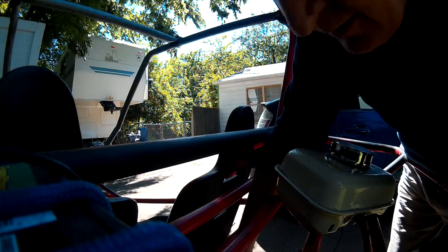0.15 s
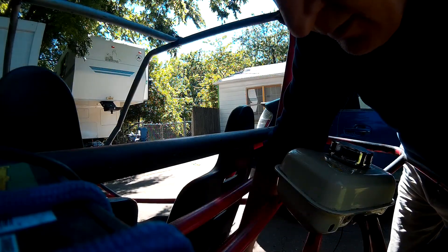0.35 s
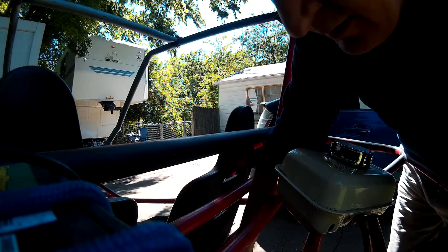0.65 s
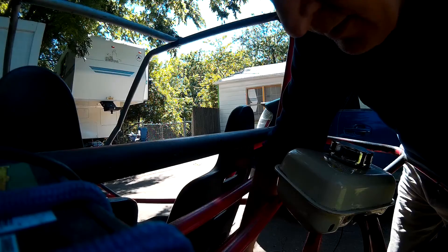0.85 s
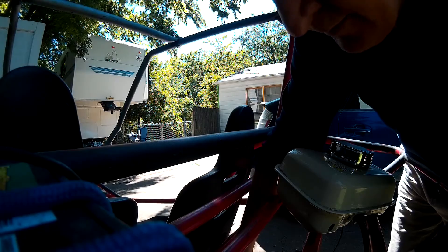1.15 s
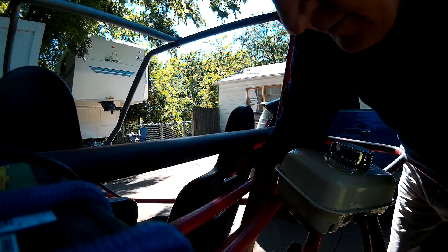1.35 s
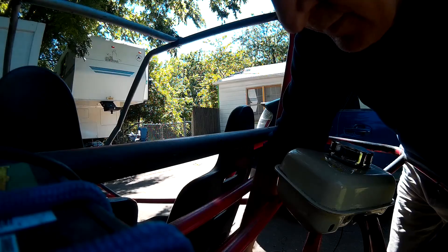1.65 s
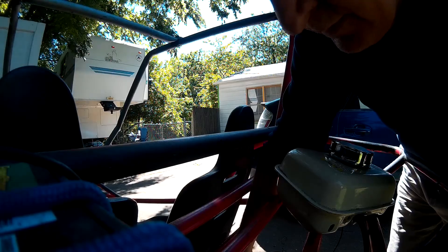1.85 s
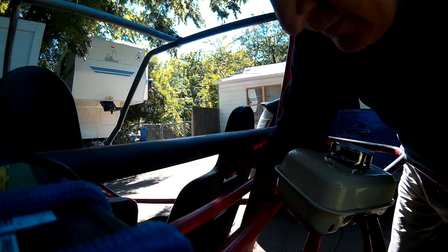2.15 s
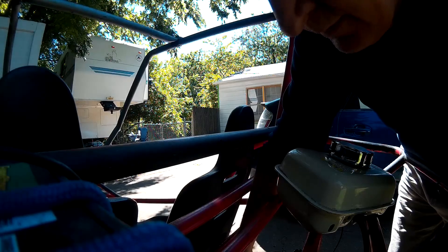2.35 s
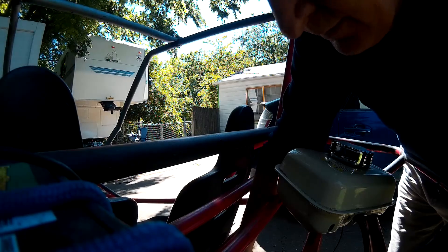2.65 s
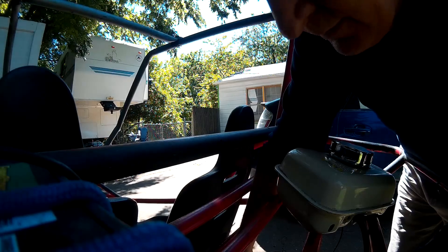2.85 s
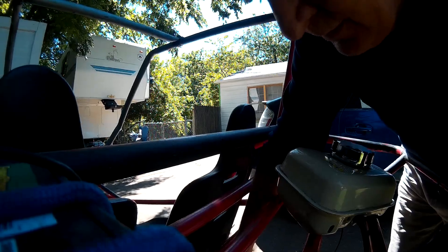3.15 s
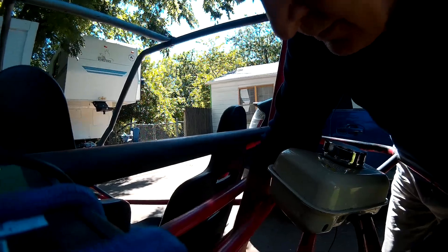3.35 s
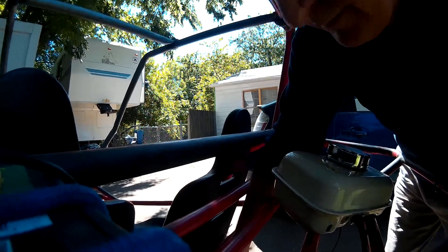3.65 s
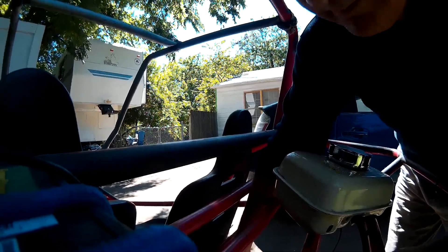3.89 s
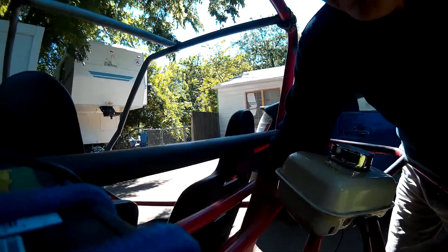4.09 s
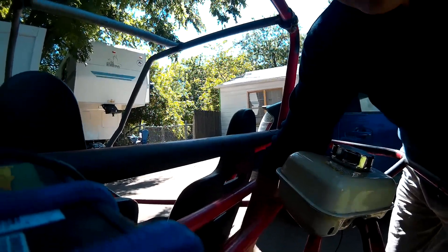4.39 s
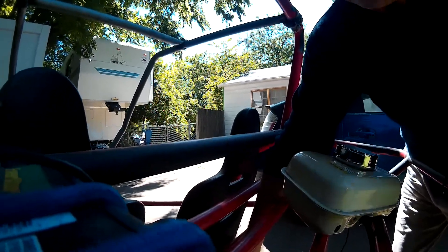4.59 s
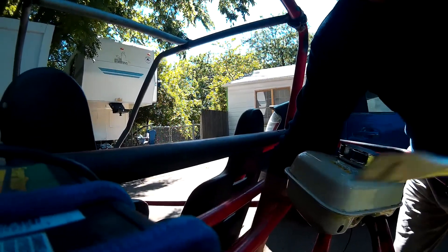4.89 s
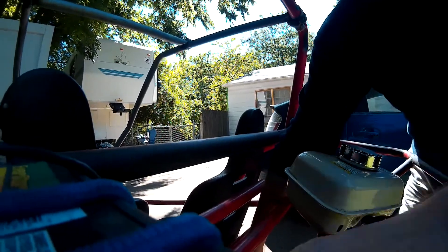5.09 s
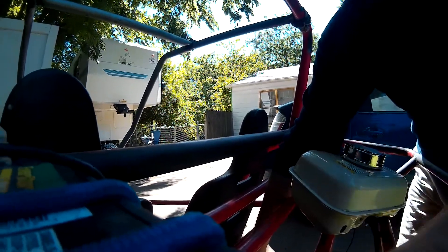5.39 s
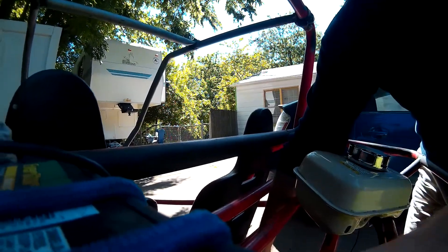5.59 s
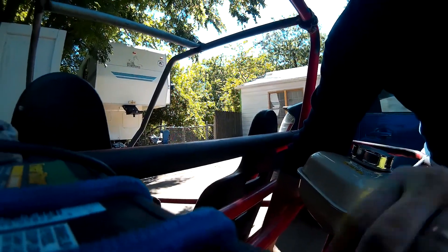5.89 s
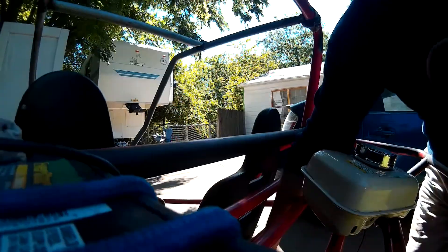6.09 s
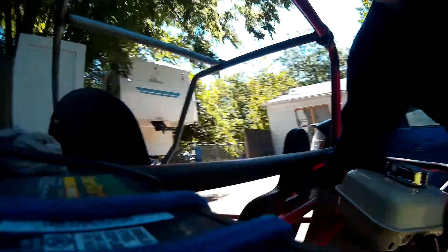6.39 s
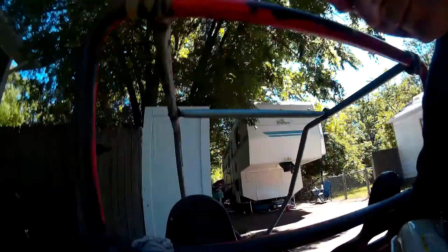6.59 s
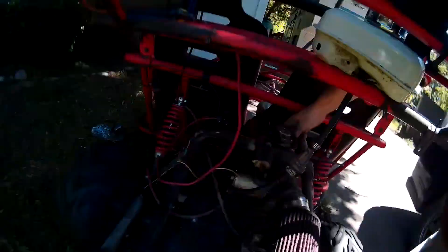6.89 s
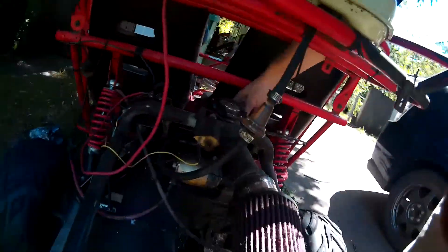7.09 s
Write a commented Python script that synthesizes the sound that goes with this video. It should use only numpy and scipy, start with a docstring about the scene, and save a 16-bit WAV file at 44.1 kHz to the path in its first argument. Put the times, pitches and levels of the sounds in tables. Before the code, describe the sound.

In a quiet yard, a go-kart's starter grinds with short metallic squeals and winds down. After a pause it tries again and fails. On the third try the single-cylinder engine coughs and catches, running raggedly before settling into a thudding idle with a muffled exhaust. Loose metal rattles, snaps and clanks over it, close enough to briefly overload the microphone.

```python
"""A single-cylinder go-kart engine in a quiet yard, with the microphone inside the frame.
The starter's gears grind and its slipping clutch squeals through two failed tries; on the third the
airbox coughs, the engine catches and firings ring the muffler, ragged at first, then a thudding idle.
Loose metal rattles, clanks and snaps over the exhaust, close enough to overload the microphone,
which swings round behind the engine near the end."""
import sys
import numpy as np
from scipy import signal
from scipy.fft import rfft, irfft
from scipy.io import wavfile

SR = 44100
rng = np.random.default_rng(int(sys.argv[2]) if len(sys.argv) > 2 else 0)


def dump_mix(stems):
    """Bounce the given channels to the path in sys.argv[1] as a 16-bit WAV at rate SR."""
    frames = np.atleast_2d(stems).T  # one column per channel
    limited = np.clip(frames, -1, 1)  # hard clip at full scale
    pcm = np.round(limited * 32767).astype(np.int16)
    wavfile.write(sys.argv[1], SR, pcm)


N = 319284
TIME = np.arange(N) / SR

# The starter housing's resonances. Each row: pitch in Hz, width in Hz, gain in dB.
HOUSING_MODES = [(742, 14, -3), (938, 39, -6.5), (1065, 35, -7), (1275, 98, -2.5), (1550, 92, -2.5),
                 (1716, 55, 3), (1805, 180, -7.5), (2730, 26, -7.5), (3230, 37, -13), (3730, 290, -17.5),
                 (4480, 37, -20)]
# The starter clutch slipping under load. Each row: start in seconds, hold in seconds,
# release in seconds, top pitch in Hz, squeal in dB, grating in dB.
CLUTCH_SLIPS = [(0.302, .008, 0.033, 1256, -21.5, -13.5), (.463, 0.0049, 0.0081, 1485, -19.5, -20),
                (.494, 0.0051, 0.0073, 1509, -11, -11.5), (0.516, .006, .01, 1434, -8, -13),
                (0.573, 0.0036, 0.03, 1486, -8.5, -12.5), (1.843, 0.0047, 0.011, 1790, -20.5, -20),
                (1.892, 0.0047, 0.018, 1472, -23, -16), (2.113, 0.0062, 0.014, 1490, -18, -14),
                (2.14, 0.0033, 0.0077, 1835, -12.5, -11), (2.8, 0.031, 0.01, 1230, -15.5, -23),
                (2.857, 0.045, 0.032, 1370, -12.5, -19), (3.415, .001, 0.0093, 1396, -11.5, -7.5)]
# The engine stumbles, fades and catches. Each row: time in seconds, strength in dB.
CATCHING = [(3.05, -29), (3.11, 4.5), (3.27, -5.5), (3.38, -14.5), (3.58, -1), (3.7, 1)]
# Combustion steadies as the engine settles. Each row: time in seconds, raggedness from 0 to 1.
RAGGEDNESS = [(3.7, 0.95), (4.3, 0.55), (4.9, 0.15), (5.5, 0)]
# The spectrum of a hard crack of metal. Each row: frequency in Hz, level in dB.
CRACK_SPECTRUM = [(500, 0.5), (1600, 6.5), (3000, -0.5), (4500, -1), (6000, -14), (10000, -13),
                  (16000, -20)]
SLIP_ATTACK_S = .006


def from_db(db):
    """Decibels to gain."""
    return 10 ** (np.asarray(db) / 20)


def rms_one(x):
    """Scale to an rms of 1."""
    return x / np.sqrt(np.mean(x ** 2) + 1e-20)


def curve(rows, outside=None):
    """Join rows of time and value by straight lines."""
    return np.interp(TIME, *np.transpose(rows), outside, outside)


def coloured(x, spectrum):
    """Give a steady signal a spectrum; rms 1."""
    hz, db = np.transpose(spectrum)
    bins = np.maximum(np.arange(N // 2 + 1) * SR / N, 1)
    gain = from_db(np.interp(np.log(bins), np.log(hz), db))
    bass_cut = np.minimum(bins / hz[0], 1) ** 2
    return rms_one(irfft(rfft(x) * gain * bass_cut, N))


def drift(per_s):
    """A random wander that turns about per_s times a second; rms 1."""
    return rms_one(np.interp(TIME * per_s, np.arange(N), rng.standard_normal(N)))


def grains(per_s, spread_db):
    """Random tiny impacts of uneven size; rms 1."""
    impacts = (rng.random(N) < per_s / SR) * rng.choice([-1, 1], N)
    return rms_one(impacts * from_db(spread_db * rng.standard_normal(N)))


def clicks(times, gains):
    """One impulse at each time."""
    at = np.round(np.asarray(times) * SR).astype(int)
    return np.bincount(np.maximum(at, 0), gains, N)[:N]


def swell(centre, length):
    """A bell-shaped rise and fall."""
    out = np.zeros(N)
    near = slice(*np.searchsorted(TIME, [centre - 3 * length, centre + 3 * length]))
    out[near] = np.exp(-2 * ((TIME[near] - centre) / length) ** 2)
    return out


def resonate(x, modes):
    """Parallel resonances of alternating sign, from rows of pitch in Hz, width in Hz, gain in dB."""
    out = 0
    for k, (hz, width, db) in enumerate(modes):
        r = np.exp(-np.pi * width / SR)
        poles = [1, -2 * r * np.cos(2 * np.pi * hz / SR), r * r]
        gain = (-1) ** k * from_db(db) * (1 - r * r) / 2
        out = out + gain * signal.lfilter([1, 0, -1], poles, x + 1e-18)
    return out


def dying(t60):
    """An envelope that falls by 60 dB in t60 seconds."""
    return np.exp(-np.minimum(np.log(1000) * TIME / t60, 50))


def play(hits, response):
    """Every hit sets off the first half second of the response."""
    return signal.oaconvolve(hits, response[:SR // 2])[:N]


def bandpass(x, low_hz, high_hz):
    """Take away the steady part and round off sharp edges."""
    return signal.sosfilt(signal.butter(2, [low_hz, high_hz], "band", fs=SR, output="sos"), x + 1e-18)


def cycle_times(share):
    """The moments at which the running engine is a given share of a cycle past firing."""
    # Running speed. Each row: time in seconds, firings per second.
    firing_rate = [(3.65, 21.5), (4.5, 20.09), (4.62, 24.43), (4.95, 21.75), (5.55, 20.65), (6.68, 21.53),
                   (6.95, 20.34), (7.24, 20.54)]
    cycles = np.cumsum(curve(firing_rate, outside=0)) / SR + .15
    return np.interp(np.arange(1, cycles[-1] - share) + share, cycles, TIME)


def strokes(share, uneven_db, jitter_s):
    """One impulse a cycle, never quite alike in time or strength."""
    times = cycle_times(share)
    late, strong = rng.standard_normal((2, len(times)))
    return clicks(times + jitter_s * late, from_db(uneven_db * strong))


def gas_puffs(pulses, turbulence, t60):
    """Each pressure step is trailed by a short rush of turbulent gas."""
    return pulses + turbulence * play(pulses, dying(t60)) * rng.standard_normal(N)


def part_db(idle_db, ragged_db, behind_db, swing_s=(6.1, 6.63)):
    """A part's idle level, shifted by ragged running and by the microphone's swing behind the engine."""
    return idle_db + ragged_db * curve(RAGGEDNESS) + behind_db * np.interp(TIME, swing_s, [0, 1])


def slip_level(start, hold, release, growth_db_per_s=44):
    """One clutch slip bites quickly, tightens while it holds and lets go."""
    out = np.zeros(N)
    near = slice(*np.searchsorted(TIME, [start - 4 * SLIP_ATTACK_S, start + hold + 4 * release]))
    age = TIME[near] - start
    bite = np.exp(-(np.minimum(age, 0) / SLIP_ATTACK_S) ** 2)
    letting_go = np.exp(-(np.maximum(age - hold, 0) / release) ** 2)
    out[near] = bite * letting_go * from_db(growth_db_per_s * np.minimum(age - hold, 0))
    return out


def yard_air(level_db=-56.5):
    """The open air around the kart: a faint, steady low rumble."""
    # The yard's background. Each row: frequency in Hz, level in dB.
    air_spectrum = [(15, -43.5), (25, -2.5), (64, -10.5), (80, -8), (102, -5), (141, -13), (157, -16),
                    (911, -24), (3080, -39), (14400, -37.5), (16000, -43.5)]
    return from_db(level_db) * coloured(rng.standard_normal(N), air_spectrum)


def starter(spin_up_db_per_s=849, coast_power=1.37, chatter_db=2.5, rasp_db=-0.53, ring_db=2.3):
    """Gears spin up, churn and coast to a stop; teeth clash in uneven bunches and ring the housing."""
    # Bouts of cranking. Each row: up to speed, drive off and standstill in seconds, level in dB.
    bouts = [(0, .03, .16, -43), (0.245, 0.59, 0.88, -17.5), (1.821, 1.97, 2.11, -22.5),
             (2.091, 2.193, 2.41, -20.5), (2.738, 2.92, 2.958, -16.5), (2.974, 3.418, 3.73, -19)]
    # Teeth grating harder for a moment. Each row: centre in seconds, length in seconds, level in dB.
    grinds = [(.008, 0.019, -28.5), (0.036, 0.013, -35), (.072, 0.0068, -32), (0.264, 0.0048, -28),
              (0.599, 0.011, -14), (0.844, 0.0049, -27.5), (1.871, .014, -16), (1.964, 0.015, -12.5),
              (2.158, 0.0079, -15), (2.288, .008, -21), (2.912, 0.017, -11), (3.047, 0.0068, -12.5),
              (3.17, .005, -9.5), (3.681, 0.0072, -5)]
    # The rasp of the gears. Each row: frequency in Hz, level in dB.
    gear_spectrum = [(45, -28.5), (130, -24.5), (300, -14), (600, -15), (720, -3), (950, -16.5),
                     (1750, -1.5), (2270, -13), (2750, -10), (3100, -17), (4400, -10), (6200, -27),
                     (11000, -30.5), (15500, -45.5)]
    churning = 0
    for at_speed, off, stop, db in bouts:
        spin_up_db = -spin_up_db_per_s * np.clip(at_speed - TIME, 0, .5)
        coasting = np.interp(TIME, [off, stop], [1, 0]) ** coast_power
        churning = churning + from_db(db - 4 + spin_up_db) * coasting
    grating = sum(from_db(db) * swell(s, length) for s, length, db in grinds)
    slipping = sum(from_db(db) * slip_level(s, hold, release)
                   for s, hold, release, _, _, db in CLUTCH_SLIPS)
    chatter = from_db(chatter_db * drift(per_s=170))
    force = np.hypot(churning, from_db(-1) * (grating + slipping)) * chatter / 2
    rasp = force * coloured(grains(per_s=5000, spread_db=3.5), gear_spectrum)
    teeth = grains(per_s=3000, spread_db=4)
    ringing = resonate(force * teeth, HOUSING_MODES) / np.std(resonate(teeth, HOUSING_MODES))
    return from_db(rasp_db) * rasp + from_db(ring_db) * ringing


def clutch(climb_hz_per_s=2000, sag_hz_per_s=14000, lowest_hz=788, waver=0.02, flutter_db=2.4):
    """Stick and slip squeals and rings the housing; pitch creeps up until compression drags it down."""
    level, hz = np.zeros(N), np.zeros(N)
    for start, hold, release, top_hz, db, _ in CLUTCH_SLIPS:
        past_top = TIME - start - hold
        glide_hz = top_hz + np.minimum(climb_hz_per_s * past_top, -sag_hz_per_s * past_top)
        hz = np.where(TIME >= start - 2 * SLIP_ATTACK_S, glide_hz, hz)
        level = level + from_db(db + 1.5) * slip_level(start, hold, release)
    rough_hz = np.maximum(hz, lowest_hz) * (1 + waver * drift(per_s=500))
    phase = 2 * np.pi * np.cumsum(rough_hz) / SR
    tone = np.sin(phase) + from_db(-10) * np.sin(2 * phase) + from_db(-13) * np.sin(3 * phase)
    squeal = level * tone * from_db(flutter_db * drift(per_s=400))
    return squeal + from_db(-8) * resonate(squeal, HOUSING_MODES)


def scuffs(rub_from_s=6.77, rub_length_s=0.036, rub_db=-27.5):
    """Short, bright, grainy scuffs: scattered at first, later one with every second firing."""
    # The scattered scuffs. Each row: centre in seconds, length in seconds, level in dB.
    lone_scuffs = [(.41, .025, -35), (2.991, 0.021, -30.5), (3.12, 0.04, -26.5), (3.278, 0.037, -29.5),
                   (3.468, 0.0079, -27), (3.69, .014, -18), (3.79, 0.02, -24), (6.359, 0.028, -26.5),
                   (6.4, .011, -17.5)]
    # Their bright hiss. Each row: frequency in Hz, level in dB.
    scuff_spectrum = [(2000, -10.5), (4800, 6.5), (7000, -1.5), (9600, 0), (11300, 0), (13000, -12.5),
                      (16000, -9.5)]
    times = cycle_times(share=0.22)
    rubs = [(s, rub_length_s, rub_db) for s in times[times > rub_from_s][::2]]
    level = sum(from_db(db) * swell(s, length) for s, length, db in list(lone_scuffs) + rubs)
    return level * coloured(grains(per_s=6700, spread_db=6.5), scuff_spectrum)


def intake(cough_db=42, thump_db=37, rumble_db=-21):
    """The airbox coughs before the engine catches, then thumps and rumbles between the firings."""
    # Single puffs and coughs. Each row: time in seconds, strength in dB.
    early_puffs = [(0.417, -25.5), (.657, -23), (2.216, -33), (2.985, -17), (3.056, -21), (3.106, -8),
                   (3.117, -17), (3.15, -23), (3.171, -8), (3.222, -15), (3.266, -12), (3.304, -17.5),
                   (3.44, -11), (3.533, -9), (3.618, -10.5), (3.657, -11.5)]
    # The airbox's resonances. Each row: pitch in Hz, width in Hz, gain in dB.
    airbox = [(43, 7.2, -3.0), (104.6, 63, -3.0), (242, 270, -2.5), (433, 220, -2.5), (890, 196, -7.5)]
    level_db = part_db(idle_db=-10.5, ragged_db=7.5, behind_db=-9) + curve(CATCHING)
    times, db = np.transpose(early_puffs)
    coughs = gas_puffs(clicks(times + .002, from_db(db + cough_db)), turbulence=0.084, t60=0.054)
    gulps = strokes(share=.57, uneven_db=3, jitter_s=.0005) * from_db(level_db + thump_db)
    thumps = gas_puffs(gulps, turbulence=0.084, t60=0.042)
    rumble = rms_one(resonate(rng.standard_normal(N), airbox))
    draught = (TIME > CATCHING[0][0]) * from_db(level_db + rumble_db) * rumble
    return bandpass(resonate(coughs + thumps, airbox) + draught, low_hz=36, high_hz=1250)


def clanks(crack_t60=0.044):
    """Steel knocks on the frame with a crack; a free part rings on, a held one hardly does."""
    # The knocks. Each row: time in seconds, crack in dB, ring in dB.
    knocks = [(1.19, -53, -63), (5.2447, -8, -19.5), (6.397, -15, -25), (6.407, -11, -38), (6.906, -6, -22),
              (6.98, -15, -21.5), (7.076, -18, -36)]
    # The ring of steel. Each row: pitch in Hz, level in dB, seconds to fall by 60 dB.
    steel_modes = [(2610, -1, 0.12), (3910, 2, 0.048), (4780, -18, 0.21), (5545, -7, 0.16),
                   (6340, -3, 0.083), (7370, -3.5, 0.063), (9400, -11, 0.15), (9400, -25, 0.5),
                   (9800, 3, 0.03)]
    ringing = sum(from_db(db) * np.sin(2 * np.pi * hz * TIME) * dying(t60)
                  for hz, db, t60 in steel_modes)
    times, crack_db, ring_db = np.transpose(knocks)
    crack_level = play(clicks(times, from_db(crack_db)), dying(crack_t60))
    cracks = crack_level * coloured(rng.standard_normal(N), CRACK_SPECTRUM)
    return cracks + play(clicks(times, from_db(ring_db)), ringing)


def snaps(length_s=0.0021):
    """Loose metal snaps right by the microphone: very short bursts with a knock and a brief ping."""
    # Single snaps of loose metal, faint to loud. Each row: time in seconds, strength in dB.
    single_snaps = [(1.772, -27.5), (3.089, -11), (3.176, -3), (3.268, -13.5), (3.752, -8.5), (3.814, 0),
                    (4.145, 1), (4.171, -10.5), (4.197, -14), (4.2499, -1), (4.485, -3.5), (4.539, -6),
                    (4.626, 0), (4.6452, 0), (4.862, -4.5), (5.1602, 1.5), (5.2329, 4), (5.83, -1.5),
                    (6.1164, 6), (6.2093, -4.5), (6.255, -3), (6.283, -7.5)]
    noise = coloured(rng.standard_normal(N), CRACK_SPECTRUM)
    events = list(single_snaps) + jolts()
    bursts = noise * sum(from_db(db - 2.2) * swell(s + .002, length_s) for s, db in events)
    ping = resonate(bursts, [(4560, 300, 3)])
    knock = resonate(bursts, [(1750, 500, -6)])
    return bursts + ping + knock


def mechanics(ring_t60=0.2, shake_t60=0.041, shake_rise_s=0.0025, steady_shake=0.63, hiss_follows=0.089):
    """Valve gear and piston knock on the block every cycle and shake loose parts into a rattle."""
    # Valve and piston contacts. Each row: share of a cycle after firing, level in dB.
    contacts = [(0.081, 3), (0.301, -19), (0.553, -7), (.68, -5), (0.859, -7.5)]
    # Loose parts rattling harder. Each row: centre in seconds, length in seconds, boost in dB.
    flurries = [(4.399, 0.03, 9.5), (6.66, 0.094, 1.5), (7.0, 0.043, 4)]
    # The midrange clatter and the hiss above it. Each row: frequency in Hz, level in dB.
    clatter_spectrum = [(70, -33), (130, -14), (350, 2), (550, -4), (800, 7), (1050, 2.5), (1400, 5.5),
                        (1900, -0.5), (2400, -12), (2750, -10), (3200, -31), (5000, -43)]
    hiss_spectrum = [(1500, -8), (2600, 4.5), (3200, -2), (4500, 0.5), (5800, -11), (8000, -12),
                     (10800, -13), (12500, -24), (15500, -29)]
    strength_db = curve(CATCHING)
    flurry_db = sum(db * swell(s, length) for s, length, db in flurries)
    clatter_db = part_db(idle_db=-20, ragged_db=1.5, behind_db=3) + strength_db + flurry_db
    hiss_db = part_db(idle_db=-30.5, ragged_db=7, behind_db=4) + hiss_follows * strength_db
    hits = sum(from_db(db) * strokes(share, uneven_db=2.5, jitter_s=0.0002) for share, db in contacts)
    block_ring = coloured(rng.standard_normal(N), clatter_spectrum) * dying(ring_t60)
    knocks = rms_one(play(hits, block_ring)) / np.sqrt(2)
    shaking = steady_shake + play(hits, 2 * dying(shake_t60) * (1 - np.exp(-TIME / shake_rise_s)))
    rattle = shaking * coloured(grains(per_s=3000, spread_db=6), clatter_spectrum)
    hiss = shaking * coloured(grains(per_s=9000, spread_db=4), hiss_spectrum)
    clatter = from_db(-4) * knocks + from_db(-3) * rattle
    fade_in = np.interp(TIME, [CATCHING[0][0], CATCHING[1][0]], [0, 1]) ** 2
    return fade_in * (from_db(clatter_db) * clatter + from_db(hiss_db - 1) * hiss)


def exhaust(blast_db=36):
    """Each firing runs up and down the pipe and rings the muffler; ragged ones rush with more gas."""
    # Pressure waves leaving the pipe, inverted by each open end. Each row: delay in seconds, gain.
    pipe_paths = [(0, 0.79), (.00335, -1.5), (0.0137, -.65)]
    # The muffler's resonances. Each row: pitch in Hz, width in Hz, gain in dB.
    muffler_modes = [(44.3, 4.8, -2.5), (111, 810, -13.5), (175.4, 155, -3.5), (464, 132, -9.5),
                     (541, 267, 1.85), (624.5, 190, 4), (1150, 340, -16)]
    level_db = part_db(idle_db=-2.5, ragged_db=-4.5, behind_db=-0.3)
    pulses = strokes(share=0, uneven_db=1.5, jitter_s=.0001) * from_db(level_db + blast_db)
    firings = gas_puffs(pulses, turbulence=0.012 + 0.028 * curve(RAGGEDNESS), t60=0.066)
    waves = sum(gain * np.interp(TIME - delay, TIME, firings, 0) for delay, gain in pipe_paths)
    return bandpass(resonate(waves, muffler_modes), low_hz=28.2, high_hz=2270)


def jolts(ragged_chance=.45, strength_db=-9, spread_db=1.5):
    """Any ragged crank turn may throw a loose part; gives the time and strength of each stray snap."""
    turns = np.sort(np.r_[cycle_times(share=.08), cycle_times(share=.56)])
    chance = ragged_chance * np.interp(turns, *np.transpose(RAGGEDNESS))
    thrown = rng.random(len(turns)) < chance
    db = strength_db + spread_db * rng.standard_normal(len(turns))
    return list(zip(turns[thrown], db[thrown]))


def yard_echo(x, echo_db=-23, t60=0.21, dull_hz=2200):
    """Fences and walls scatter a faint, dull tail back behind the close sound."""
    lowpass = signal.butter(2, dull_hz, fs=SR, output="sos")
    tail = signal.sosfilt(lowpass, rng.standard_normal(N)) * dying(t60)
    return x + from_db(echo_db) * play(x, tail / np.sqrt(np.sum(tail ** 2)))


def scene():
    """Starter, engine and loose metal at close range in a quiet yard, in mono."""
    kart = starter() + clutch() + scuffs() + intake() + clanks() + snaps() + mechanics() + exhaust()
    return (yard_echo(kart) + yard_air())[None]


def record(dry, port_hz=12500, overload=.72, cutoff_hz=16000):
    """The microphone port dulls the treble, loud peaks overload with flat tops, the very top is cut."""
    dulled = signal.sosfilt(signal.butter(2, port_hz, fs=SR, output="sos"), dry)
    clipped = np.clip(dulled, -overload, overload)
    return signal.sosfilt(signal.ellip(10, .1, 80, cutoff_hz, fs=SR, output="sos"), clipped)


dry = scene()
out = record(dry)
dump_mix(out)
```